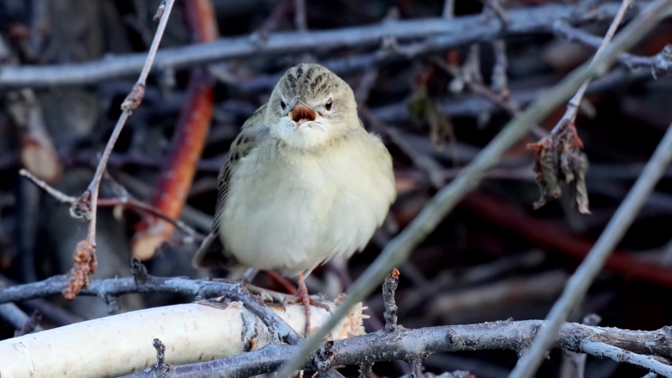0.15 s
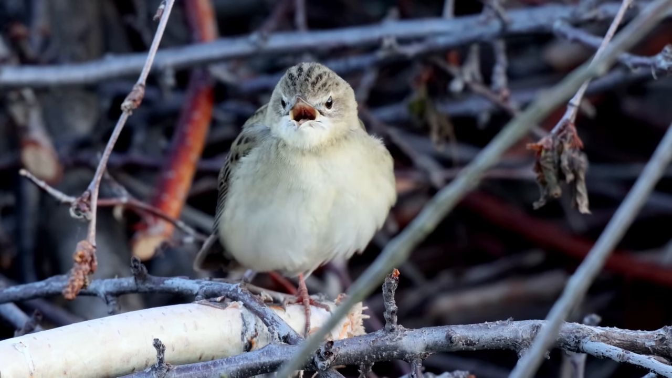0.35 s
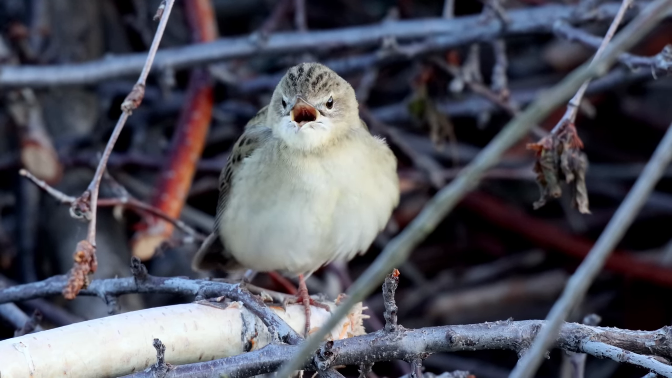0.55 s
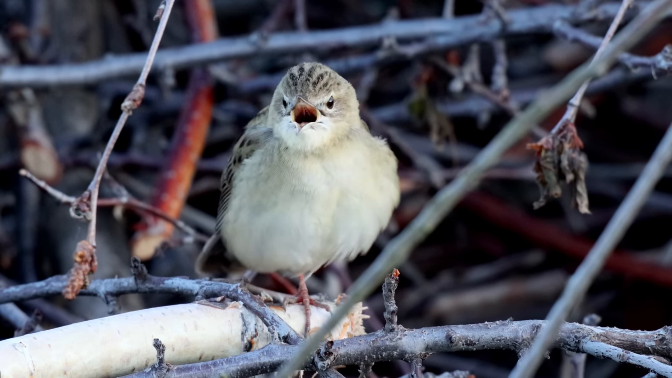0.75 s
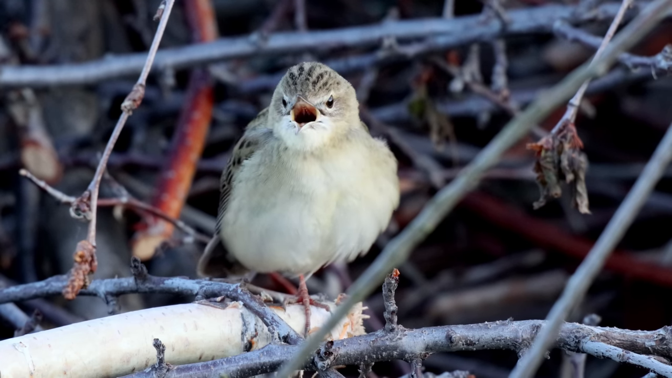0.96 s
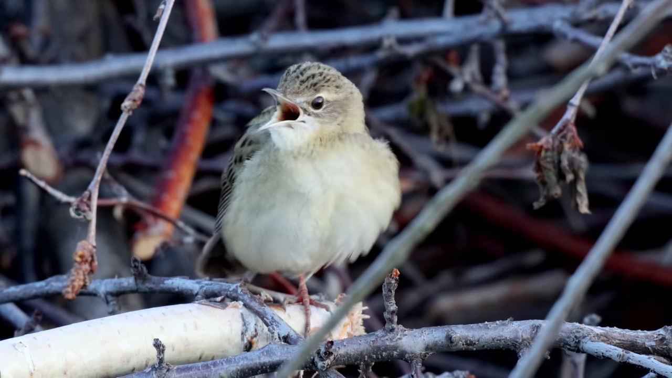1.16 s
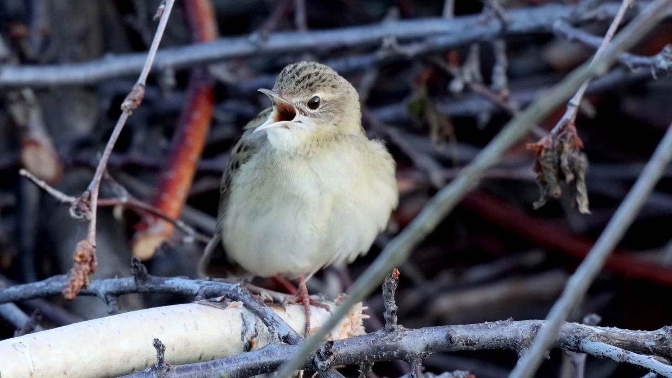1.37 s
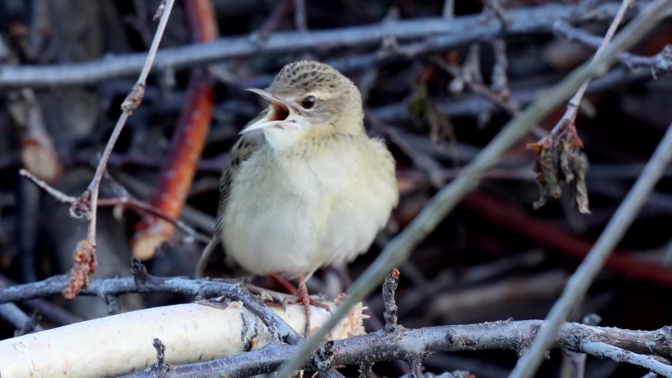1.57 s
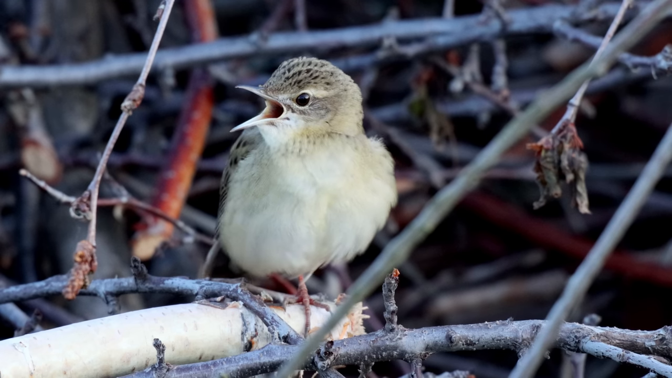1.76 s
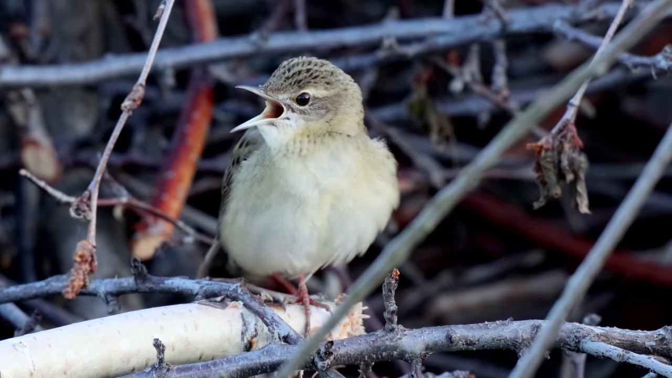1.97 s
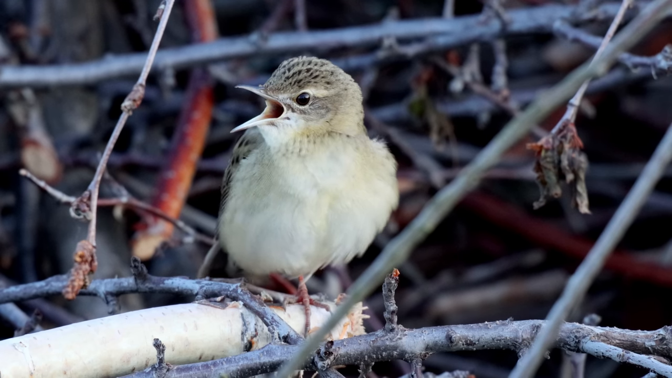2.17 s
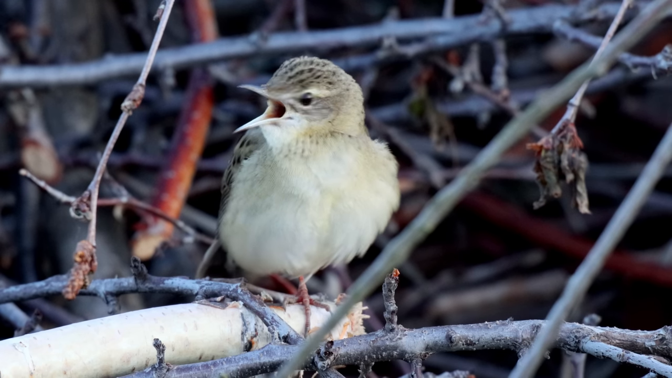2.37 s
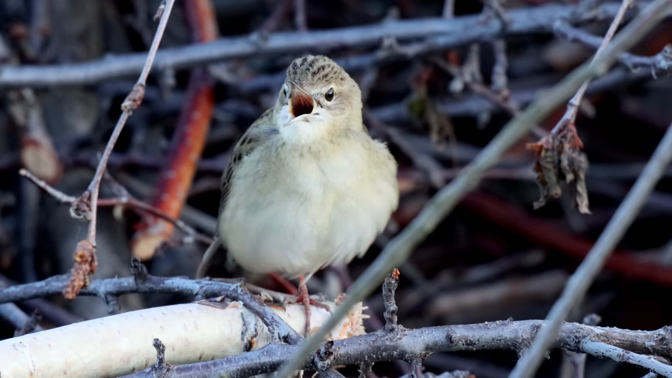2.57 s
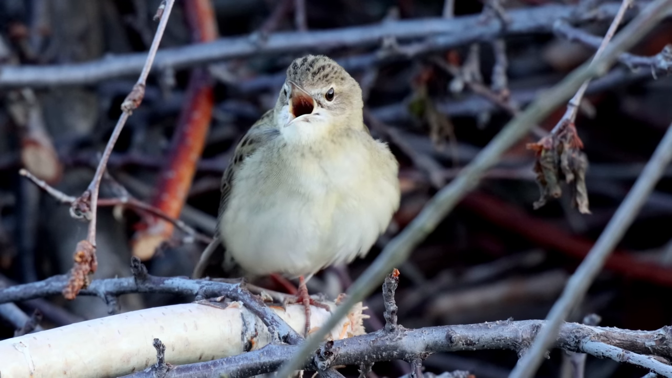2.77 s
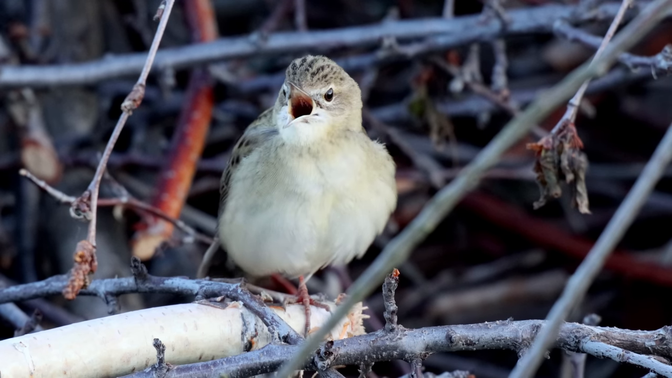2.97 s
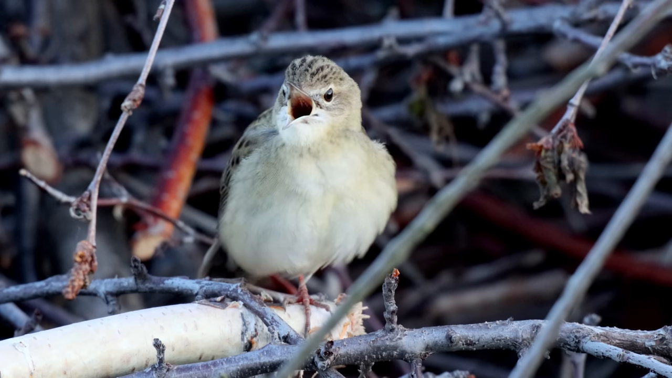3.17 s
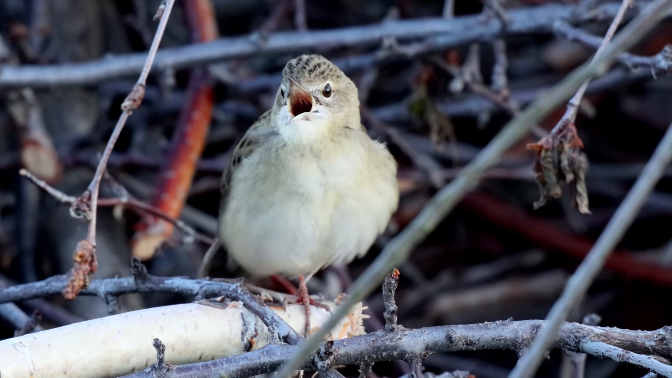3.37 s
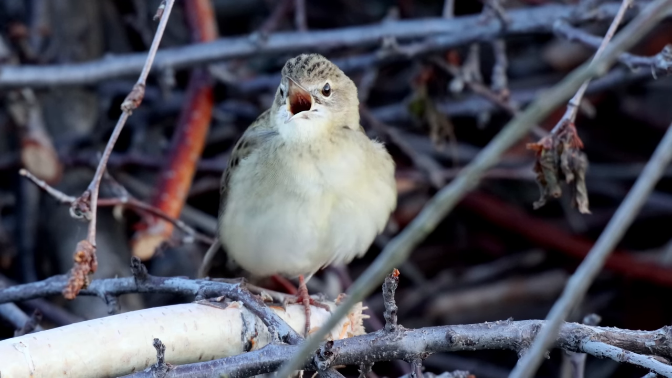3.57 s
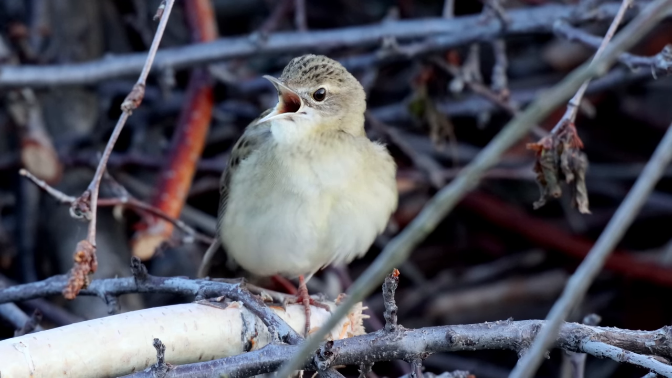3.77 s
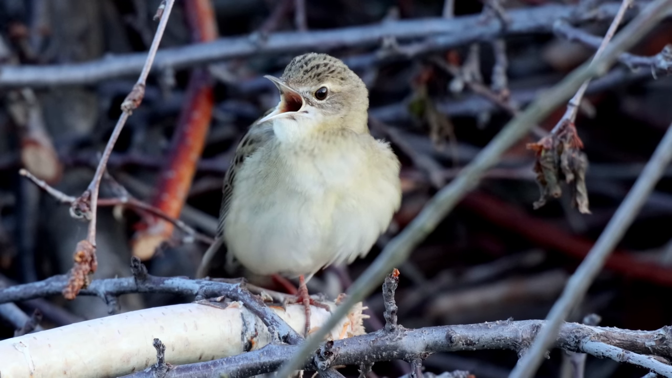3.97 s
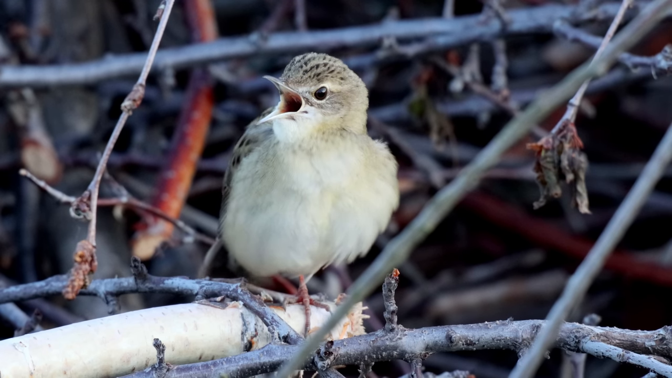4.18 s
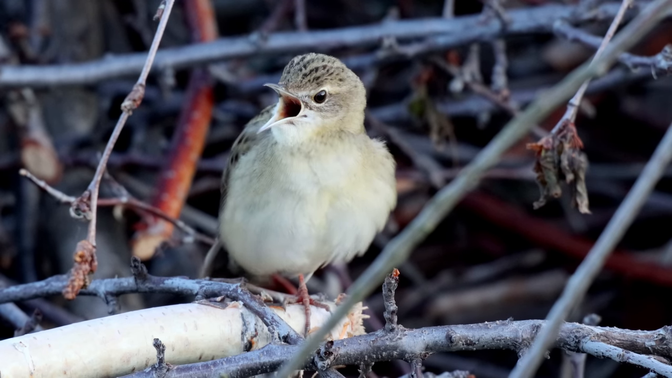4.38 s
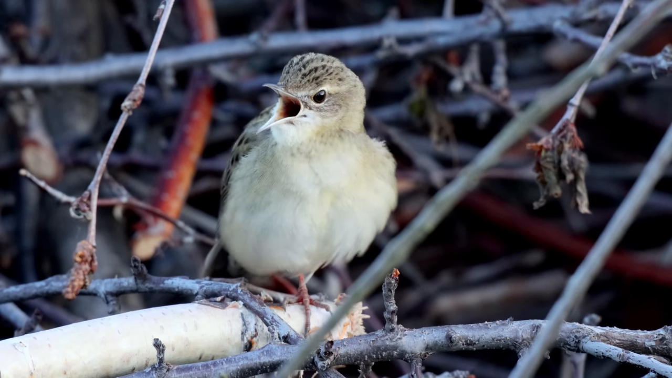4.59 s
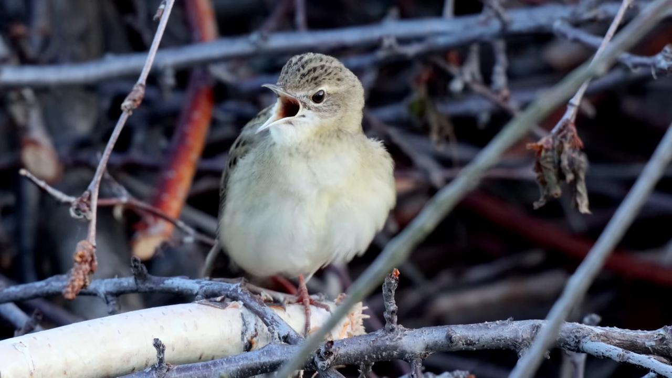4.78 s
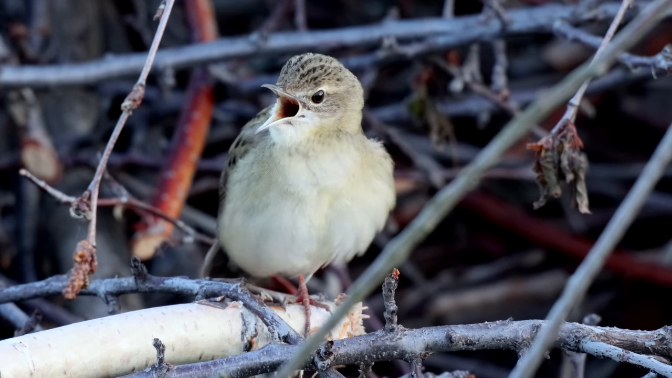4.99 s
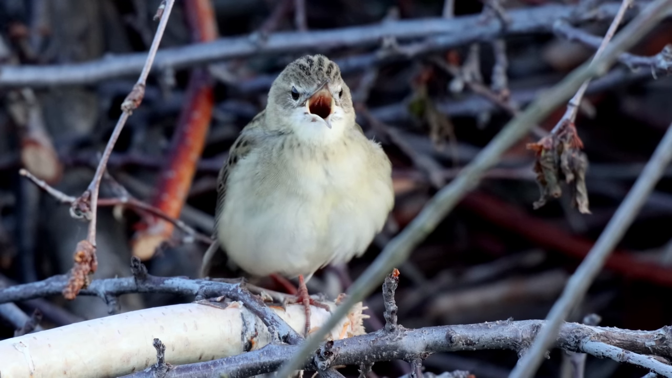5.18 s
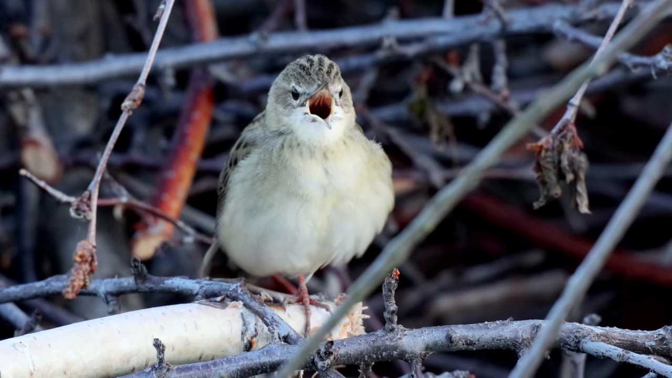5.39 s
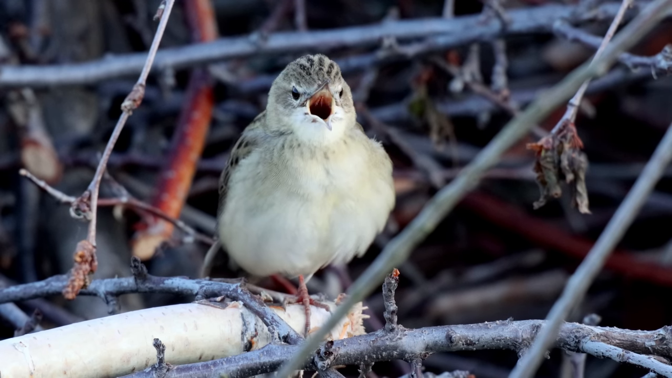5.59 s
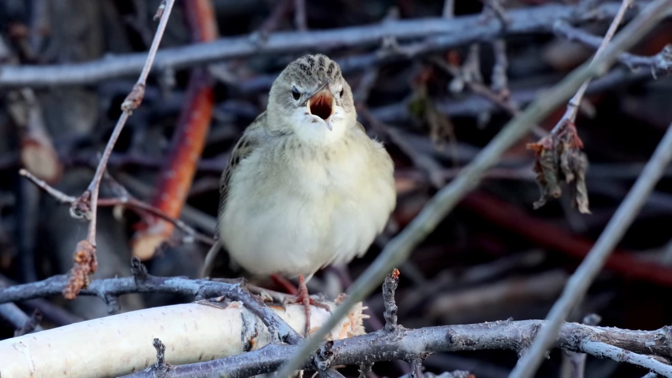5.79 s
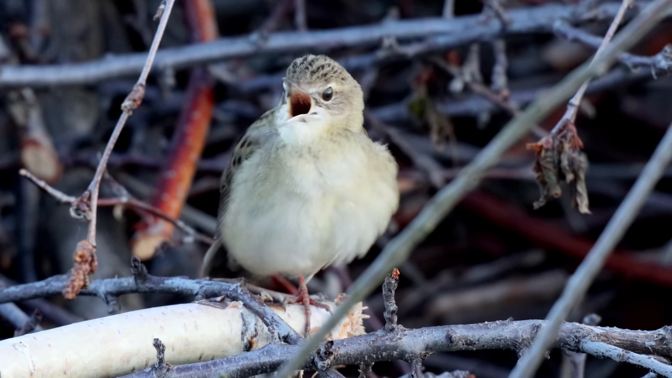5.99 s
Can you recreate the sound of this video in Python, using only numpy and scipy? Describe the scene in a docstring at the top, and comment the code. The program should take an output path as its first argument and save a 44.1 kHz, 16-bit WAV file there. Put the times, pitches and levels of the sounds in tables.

```python
"""A grasshopper warbler reeling close by

A grasshopper warbler sings from a heap of branches, swelling to full voice over the first seconds.
About 25 times a second it gives a tick, a rough sweep upwards, and a whistle, a nearly pure tone that falls.
Delayed copies of the song are the echoes of branches; fading noise smears it into those of twigs and bushes.
Behind it: filtered noise for a far road and still air, gliding tones for far birds, low ringing knocks."""
import sys
import numpy as np
from scipy import signal
from scipy.fft import rfft, irfft, next_fast_len
from scipy.io import wavfile
from scipy.ndimage import uniform_filter1d

SR = 44100
rng = np.random.default_rng(int(sys.argv[2]) if len(sys.argv) > 2 else 0)


def master(y):
    """Save y as 16-bit WAV."""
    cut = np.clip(np.atleast_2d(y).T, -1, 1)
    pcm = np.round(cut * 32767)  # scale
    wavfile.write(sys.argv[1], SR, pcm.astype(np.int16))


N = 266275
TIME = np.arange(N) / SR  # seconds

# still air and microphone hiss: (frequency [Hz], relative level [dB], likeness of left and right [0-1])
AIR_COLOUR = [(24, -34, .8), (40, -16, .8), (57.4, 2, 0.94), (80, -1, 0.57), (117, -3, 0.26),
              (272, -2.5, 0.28), (452, -8.5, 0), (1400, -13, 0.7), (2380, -16, 0.32), (4550, -15, 0),
              (8750, -18, 0), (16100, -20, 0), (16400, -36, .2)]
AIR_DB = -44.5

# loudness of the far road before its flutter: (time [s], level [dB])
ROAD_LEVEL = [(0, -42), (.6, -40.5), (1.5, -40.5), (2.8, -40), (3.1, -39), (3.4, -38), (3.65, -40),
              (4, -42), (5, -42), (6.04, -41.5)]
# colour of the far road: (frequency [Hz], relative level [dB])
ROAD_COLOUR = [(300, -23), (480, -15), (600, -9.5), (720, -8), (830, -2.5), (1020, 1), (1130, -2.5),
               (1230, -10.5), (1340, -32), (1600, -29), (2600, -52)]
ROAD_PAN_DB = -5.5  # left minus right

# soft knocks, before a shared gain: (time [s], level [dB], pitch [Hz], left minus right [dB])
KNOCKS = [(0.948, -36, 194, 0.0), (1.54, -32.5, 264, 8), (1.703, -35.5, 279, 13), (1.922, -28.5, 264, 11),
          (2.523, -33, 250, 11), (2.745, -31, 270, 11), (2.83, -34, 158, 4), (3.824, -30.5, 264, 7)]

# calls of far birds, before the blur of distance:
# (time [s], length [s], first pitch [Hz], last pitch [Hz], level [dB])
FAR_CALLS = [(.15, .03, 3120, 3190, -52), (0.196, 0.028, 3950, 3760, -50), (0.308, 0.014, 3430, 3490, -45),
             (.89, 0.054, 2150, 2880, -51), (1.118, 0.054, 2000, 2530, -53),
             (1.341, 0.066, 1840, 2780, -47), (1.492, .06, 3580, 3120, -48), (1.816, .08, 1900, 2940, -46),
             (4.8, 0.075, 3750, 3160, -51)]

# speed of the reel: (time [s], tick-and-whistle pairs per second [1/s])
REEL_RATE = [(0, 25.827), (5, 24.832), (6, 25.096)]
# first tick, wait from a tick to its whistle, unsteadiness of each note (all in seconds)
FIRST_TICK_S, WHISTLE_LAG_S, JITTER_S = .133, .0146, .0003

# course of a whistle, before each note is stretched and its glide varied:
# (time [ms], share of the starting pitch [ratio], amplitude [ratio], weight of the second half [0-1])
WHISTLE_SHAPE = [(-.35, 1.0, 0, 0), (.3, 1.015, 1.0, 0), (1.3, 1.0, 1.0, 0), (2.6, .985, .92, .4),
                 (4.0, .955, .95, 1), (5.2, .925, .75, 1), (6.6, .905, 0, 1)]
# starting pitch of the whistles, before a shared lift and chance: (time [s], pitch [Hz])
WHISTLE_PITCH = [(0.0, 6150), (0.34, 6590), (1.9, 6700), (1.98, 6430), (2.14, 6750), (2.37, 6490),
                 (2.61, 6790), (2.79, 6520), (3.04, 6760), (4.24, 6590), (4.3, 6830), (5.23, 6640),
                 (5.28, 6810), (5.99, 6630), (6.04, 6600)]
# whistles that falter: (time [s], change of level [dB])
FALTERS = [(1.08, -8), (1.98, -5.5), (2.3, -2), (3.64, -8.5), (3.84, -3.5), (4.16, -4.5), (5.21, -2)]
# colour of the noise mixed into a whistle: (frequency [Hz], relative level [dB])
WHISTLE_NOISE = [(1500, -55), (3000, 4), (4800, 19.5), (7300, 13), (8400, 13), (10000, 13), (12000, 7),
                 (15000, -20)]
# swell of the whistles: full level before a shared gain, how far below it they start, time constant
WHISTLE_FULL_DB, WHISTLE_SWELL_DB, WHISTLE_SWELL_S = -4.5, 25, 1.68
LEAD_IN_DB = 6.5  # whistles before the first tick are softer by this much

# course of a tick, from the small click of the opening syrinx to the top of the sweep, before each is varied:
# (time from the peak [ms], pitch [Hz], amplitude [ratio], octave amplitude [ratio], rasp amplitude [ratio])
TICK_SHAPE = [(-5.35, 3600, 0, 0, 0), (-5.15, 3900, .04, .11, .035), (-4.55, 4700, 0, 0, 0),
              (-1.95, 3300, 0, 0, 0), (-1.3, 4300, .1, .2, .02), (-.9, 4800, .52, .24, .025),
              (-.5, 5450, .42, .02, .035), (-.08, 6850, 1.05, .02, .06), (.25, 7350, .85, .02, .05),
              (.6, 7750, .26, 0, .03), (1.2, 8200, 0, 0, 0)]
# roughness of a tick, coloured by throat and beak: (frequency [Hz], relative level [dB])
TICK_RASP = [(1500, -30), (3000, -3), (3900, 1), (4800, 6), (7500, 11), (9800, -10), (11200, -6),
             (12500, -2), (15000, -4)]
# swell of the ticks: full level, how far below it the swell starts, time constant
TICK_FULL_DB, TICK_SWELL_DB, TICK_SWELL_S = -9, 30.5, 1.12

# what throat and open beak let through: (frequency [Hz], gain [dB])
BEAK = [(2500, 3), (3700, 1.5), (4700, 1), (5500, -1.5), (6600, -2.5), (7400, -0.5), (8400, 7.5),
        (9200, -2), (10100, -1), (11000, -4), (12300, -0.5), (15000, -3.5)]

# echoes from the perch and the nearest branches: (delay to left ear [ms], delay to right ear [ms], gain [ratio])
BRANCHES = [(.157, .297, .13), (.304, .436, .21), (.46, .585, .11), (.72, .718, -.13), (1.092, 1.089, .14),
            (1.501, 1.519, -.08), (1.648, 1.651, .22), (2.12, 2.128, -.12), (2.93, 2.96, .07),
            (4.371, 4.372, -.08), (8.7, 8.71, .11)]
# blurred echoes: level, time to fade by 60 dB, time constant of the build-up
TWIGS_DB, TWIGS_T60_S, TWIGS_BUILD_S = -12, .06, .0012
BUSHES_DB, BUSHES_T60_S, BUSHES_BUILD_S = -20, .17, .008  # further off


def undb(db):
    """Turn decibels into a plain gain."""
    return 10 ** (np.asarray(db) / 20)


def pan(db):
    """Left and right gains for a level difference, left minus right."""
    return undb(np.array([[db], [-db]]) / 2)


def course(table, at):
    """The other columns of a table, read along its first column with straight lines between the rows."""
    key, *columns = np.transpose(table)
    return [np.interp(at, key, column) for column in columns]


def add(track, start_s, sound):
    """Mix a sound into a track from a given time on."""
    start = int(round(start_s * SR))
    first, last = max(start, 0), min(start + sound.shape[-1], N)
    if last > first:
        track[..., first:last] += sound[..., first - start:last - start]


def coloured(sound, colour):
    """Make each frequency of a sound stronger or weaker as a colour table says."""
    hz, db = np.transpose(colour)[:2]
    size = next_fast_len(len(sound))
    bins_hz = np.fft.rfftfreq(size, 1 / SR)
    gain = undb(np.interp(np.log(bins_hz + 1), np.log(hz), db))
    return irfft(rfft(sound, size) * gain, size)[:len(sound)]


def noise(colour, size=N):
    """Coloured noise, scaled to an average strength (rms) of 1."""
    hiss = coloured(rng.standard_normal(size), colour)
    return hiss / hiss.std()


def walk(rate):
    """Smooth random wandering with a spread near 1, from `rate` random values per second."""
    hold = int(SR / rate)
    steps = np.repeat(rng.standard_normal(N // hold + 1), hold)
    smooth = uniform_filter1d(uniform_filter1d(steps, hold), hold)
    return 1.64 * smooth[:N]  # makes up for the spread lost in smoothing


def turn(hz):
    """Phase of a gliding tone: the pitch added up over time."""
    return 2 * np.pi * np.cumsum(hz) / SR


def scatter(sound, t60_s, build_s):
    """Countless weak reflections that build up and die away, different at each ear."""
    t = TIME[:SR // 2]
    envelope = undb(-60 * t / t60_s) * (1 - np.exp(-t / build_s))
    tail = rng.standard_normal((2, len(t))) * envelope
    tail /= np.sqrt((tail ** 2).sum(axis=1, keepdims=True))
    return signal.fftconvolve(sound[None], tail, axes=1)[:, :N]


def air():
    """Low rumble shared by both ears under a wide, even hiss."""
    hz, _, likeness = np.transpose(AIR_COLOUR)
    alike = np.clip(np.interp(np.fft.rfftfreq(N, 1 / SR), hz, likeness), 0, 1)
    # the middle is equal in both ears, the side is opposite: their balance sets the likeness
    middle = irfft(rfft(noise(AIR_COLOUR)) * np.sqrt((1 + alike) / 2), N)
    side = irfft(rfft(noise(AIR_COLOUR)) * np.sqrt((1 - alike) / 2), N)
    return undb(AIR_DB) * np.array([middle + side, middle - side])


def road(flutter_db=0.76, side_db=-19):
    """Far tyres merge into a narrow hum near 1 kHz, a little to the right."""
    level_db, = course(ROAD_LEVEL, TIME)
    side = noise(ROAD_COLOUR) * np.array([[1], [-1]])
    hum = noise(ROAD_COLOUR) + undb(side_db) * side
    return pan(ROAD_PAN_DB) * undb(level_db + flutter_db * walk(5.926)) * hum


def knocks(gain_db=2, t60_s=0.053, rise_s=.003):
    """Dull taps, each a single low tone that rings and quickly dies away."""
    out, t = np.zeros((2, N)), TIME[:SR // 5]
    envelope = undb(-60 * t / t60_s) * (1 - np.exp(-t / rise_s))
    for start_s, db, hz, pan_db in KNOCKS:
        ring = np.sin(2 * np.pi * hz * t) * envelope
        add(out, start_s, undb(db + gain_db) * pan(pan_db) * ring)
    return out


def far_birds(waver=0.02):
    """Short wavering slurs, blurred by distance."""
    calls = np.zeros(N)
    for start_s, length_s, first_hz, last_hz, db in FAR_CALLS:
        n = int(length_s * SR)
        hz = np.linspace(first_hz, last_hz, n) * (1 + waver * walk(300)[:n])
        fade = signal.windows.tukey(n, .5)
        add(calls, start_s, undb(db) * fade * np.sin(turn(hz)))
    return .7 * calls + scatter(calls, t60_s=.4, build_s=.008)


def thicket(song, pan_db=-1.96):
    """Direct song, single echoes from the branches, then blurred echoes of twigs and bushes."""
    left_ms, right_ms, gain = np.transpose(BRANCHES)
    delays = np.array([left_ms, right_ms])[..., None] * SR / 1000
    # sinc pulses allow delays that fall between two samples
    pulses = gain @ np.sinc(np.arange(SR // 100) - delays)
    echoes = signal.fftconvolve(song[None], pulses, axes=1)[:, :N]
    # as the bird turns its head, the song reaches other twigs
    head = walk(1.26)
    twigs = sum(aim * scatter(song, TWIGS_T60_S, TWIGS_BUILD_S) for aim in (np.cos(head), np.sin(head)))
    bushes = scatter(song, BUSHES_T60_S, BUSHES_BUILD_S)
    return pan(pan_db) * (song + echoes + undb(TWIGS_DB) * twigs + undb(BUSHES_DB) * bushes)


def reel(lag_s=0):
    """Times of one note in every cycle of the reel, slightly unsteady."""
    rate, = course(REEL_RATE, TIME)
    cycles = np.cumsum(rate) / SR
    cycles -= np.interp(FIRST_TICK_S, TIME, cycles)  # cycle 0 falls on the first tick
    times = np.interp(np.arange(np.ceil(cycles[0]), cycles[-1]), cycles, TIME)
    return times + lag_s + JITTER_S * rng.standard_normal(len(times))


def swell(times, full_db, depth_db, swell_s):
    """Level of notes that start softly and settle at full voice."""
    return full_db - depth_db * np.exp(-times / swell_s)


def whistle_notes(accent_db=1.34, accent_hz=28, wander_hz=45, lift_hz=30,
                  late_db=-5.0, late_spread_db=2.5, soft_below_db=-16, soft_fade=0.8):
    """Rows (time [s], level [dB], pitch [Hz], second half [dB]): stressed notes higher, soft ones fade early."""
    times = reel(WHISTLE_LAG_S)
    accent, wander, hold = rng.standard_normal((len(times), 3)).T
    db = swell(times, WHISTLE_FULL_DB, WHISTLE_SWELL_DB, WHISTLE_SWELL_S) + accent_db * accent
    db -= LEAD_IN_DB * (times < FIRST_TICK_S)
    for falter_s, change_db in FALTERS:
        db[np.argmin(np.abs(times - falter_s))] += change_db  # the nearest whistle
    hz = course(WHISTLE_PITCH, times)[0] + lift_hz + accent_hz * accent + wander_hz * wander
    second_half_db = late_db + late_spread_db * hold - soft_fade * np.maximum(soft_below_db - db, 0)
    return np.transpose([times, db, hz, np.minimum(second_half_db, 0)])


def whistles(gain_db=-2.5, glide_spread=0.24, length_spread=0.122,
             octave_db=-46, octave_growth=0.038, octave_spread_db=4.0, noise_db=-29):
    """Falling tones with a little noise, most at the start; their faint octave hardly grows with the note."""
    out, ms = np.zeros(N), np.arange(-44, 400) * 1000 / SR
    notes = whistle_notes()
    chances = rng.standard_normal((len(notes), 3))
    for (start_s, db, hz, late_db), (length, glide, overtone) in zip(notes, chances):
        bend, size, late = course(WHISTLE_SHAPE, ms / (1 + length_spread * length))
        phase = turn(hz * (1 + (bend - 1) * (1 + glide_spread * glide)))
        added_noise = undb(noise_db) * (1 - late / 2) * noise(WHISTLE_NOISE, len(ms))
        tone = np.sin(phase) + added_noise
        octave_level_db = octave_db + octave_growth * db + octave_spread_db * overtone
        octave = undb(octave_level_db) * np.sin(2 * phase)
        envelope = size * undb(late * late_db)
        add(out, start_s + ms[0] / 1000, envelope * (undb(db + gain_db) * tone + octave))
    return out


def tick_notes(accent_db=1.0, unsteady_db=3.0):
    """Rows (time [s], level [dB]): ticks join after a few whistles and grow more even as the voice settles."""
    times = reel()
    times = times[np.argmin(np.abs(times - FIRST_TICK_S)):]
    spread_db = accent_db + unsteady_db * np.exp(-times / TICK_SWELL_S)
    db = swell(times, TICK_FULL_DB, TICK_SWELL_DB, TICK_SWELL_S)
    return np.transpose([times, db + spread_db * rng.standard_normal(len(times))])


def ticks(pitch_spread=0.01, length_spread=0.044, tilt_spread_db=.35, soft_below_db=-19.0,
          soft_rise=0.0039, soft_tilt=1.0, rasp_db=4.0, rasp_growth=0.5):
    """A small click, then 5 ms later a rough sweep over an octave; soft ticks are higher, thinner and raspier."""
    out, ms = np.zeros(N), np.arange(-320, 80) * 1000 / SR
    notes = tick_notes()
    chances = rng.standard_normal((len(notes), 3))
    for (peak_s, db), (length, pitch, lean) in zip(notes, chances):
        softness_db = np.clip(soft_below_db - db, 0, 14)
        hz, size, octave, rasp = course(TICK_SHAPE, ms / (1 + length_spread * length))
        sweep_hz = hz * (1 + pitch_spread * pitch + soft_rise * softness_db)
        phase = turn(sweep_hz) + rng.uniform(0, 2 * np.pi)
        # the low start of the sweep is stronger in some ticks than in others
        tilt = undb((tilt_spread_db * lean - soft_tilt * softness_db) * np.clip(-ms, 0, 1))
        tone = tilt * size * np.sin(phase) + octave * np.sin(2 * phase)
        # the rasp grows less than the tone in louder ticks
        roughness = undb(rasp_db + rasp_growth * db) * tilt * rasp * noise(TICK_RASP, len(ms))
        add(out, peak_s + ms[0] / 1000, undb(db) * tone + roughness)
    return out


def scene():
    """The warbler in its thicket, in front of the quiet landscape."""
    background = air() + road() + knocks() + far_birds()
    song = coloured(whistles() + ticks(), BEAK)
    return background + thicket(song)


def record(dry):
    """The recorder drops the deepest rumble and cuts the top steeply."""
    thinned = signal.sosfilt(signal.butter(3, 32, "high", fs=SR, output="sos"), dry)  # Hz
    return signal.sosfilt(signal.butter(14, 15500, fs=SR, output="sos"), thinned)  # Hz


dry = scene()
out = record(dry)
master(out)
```